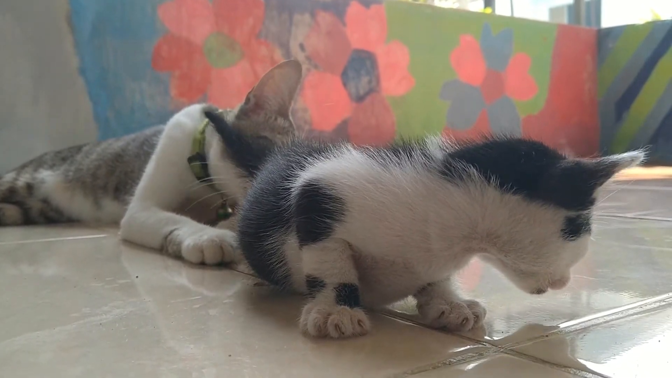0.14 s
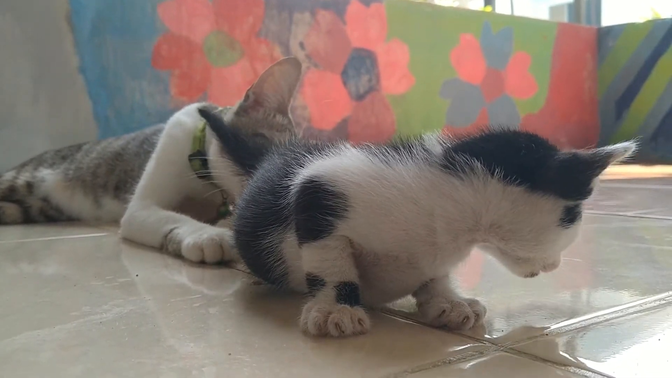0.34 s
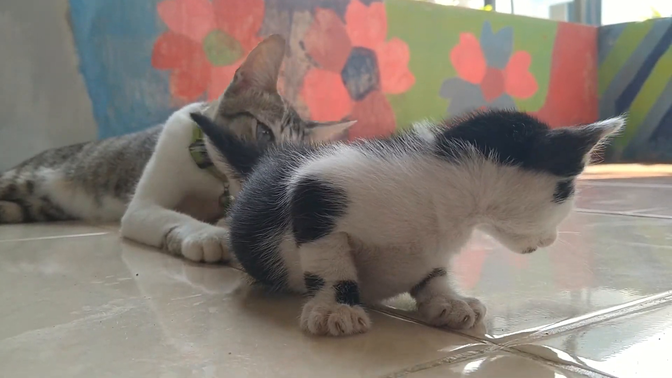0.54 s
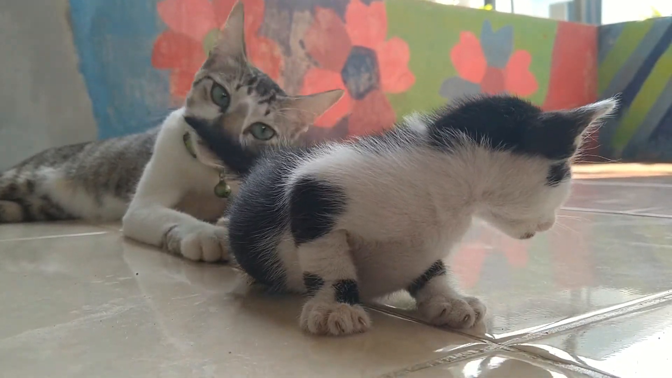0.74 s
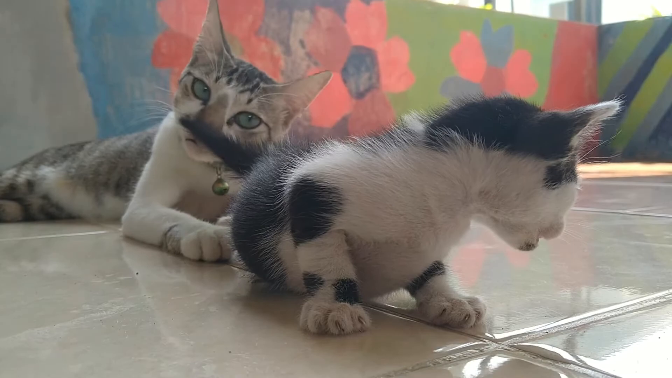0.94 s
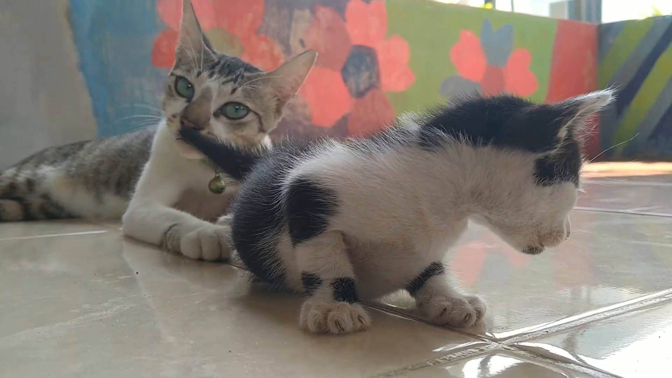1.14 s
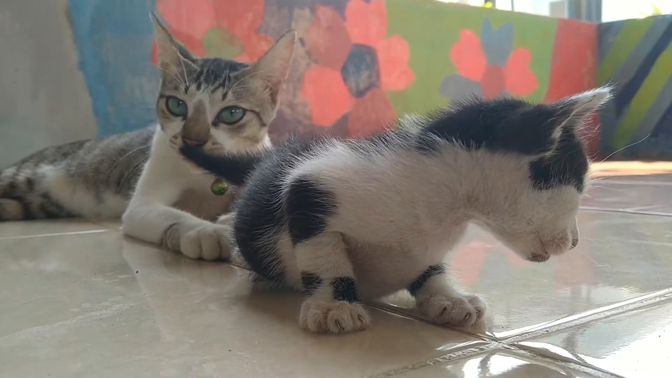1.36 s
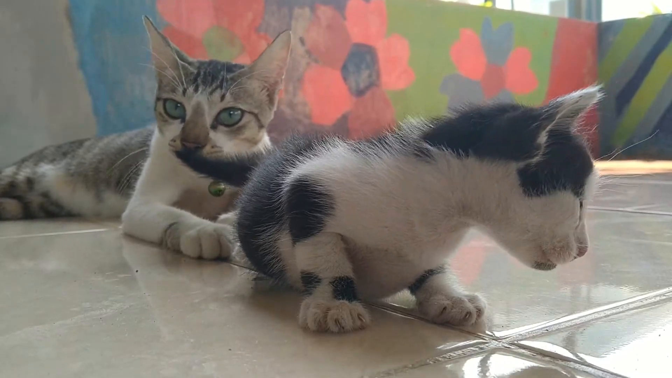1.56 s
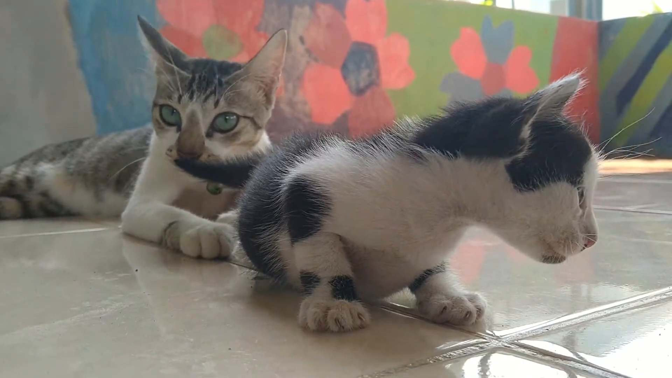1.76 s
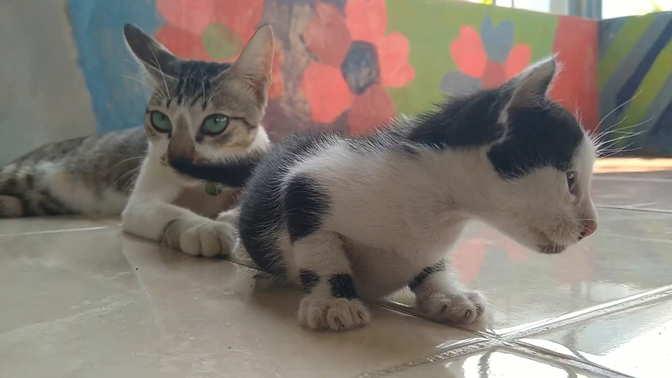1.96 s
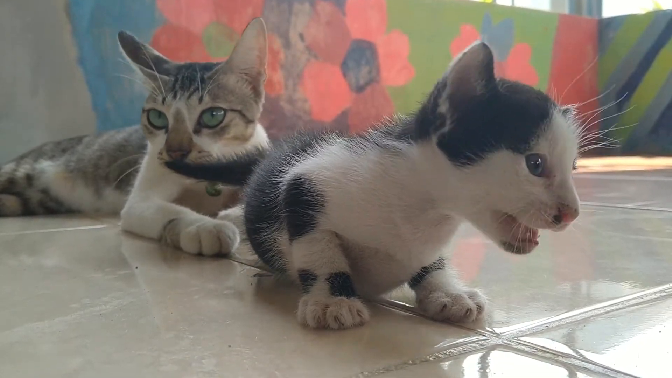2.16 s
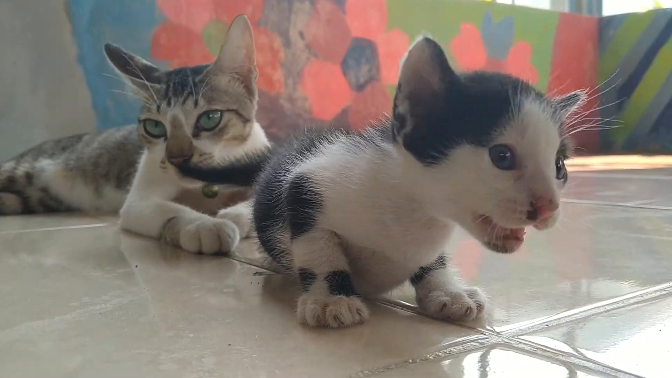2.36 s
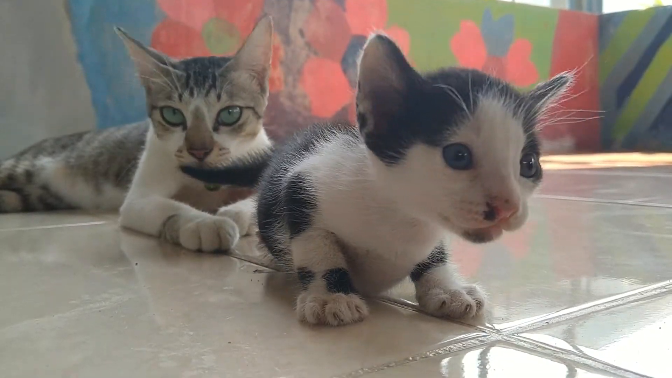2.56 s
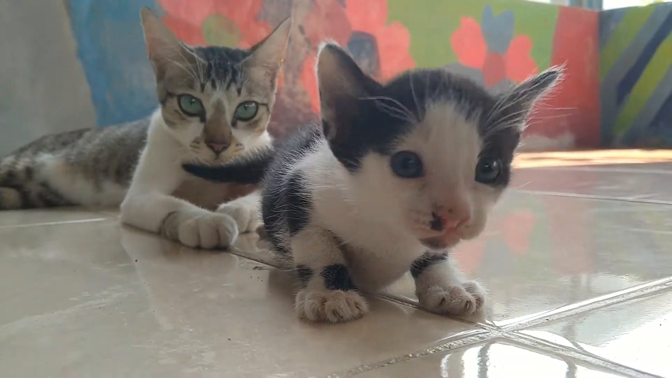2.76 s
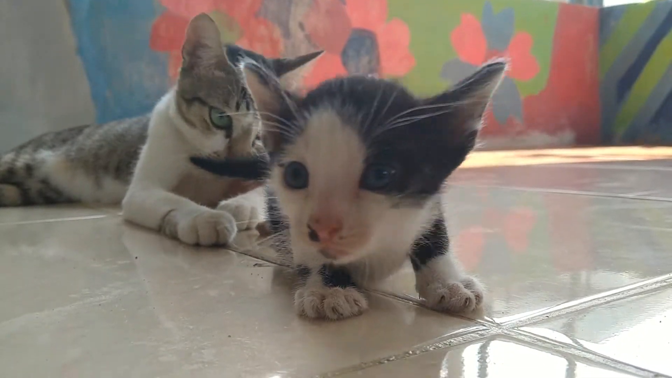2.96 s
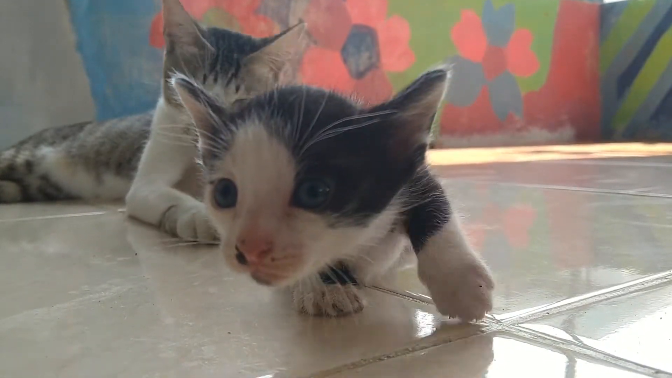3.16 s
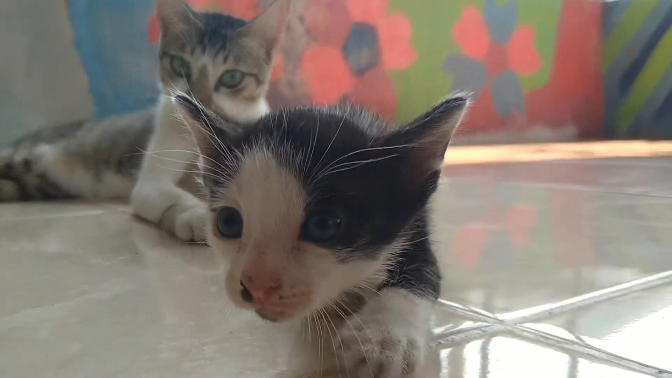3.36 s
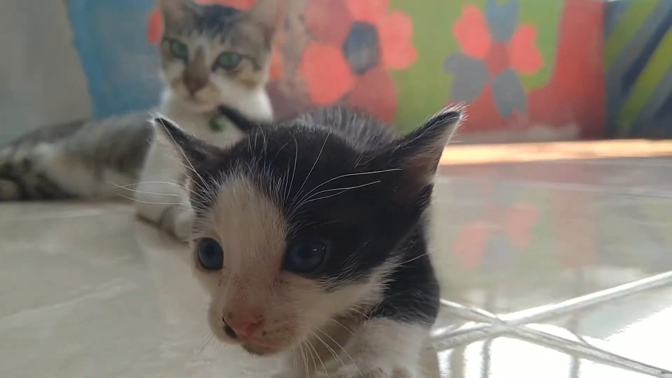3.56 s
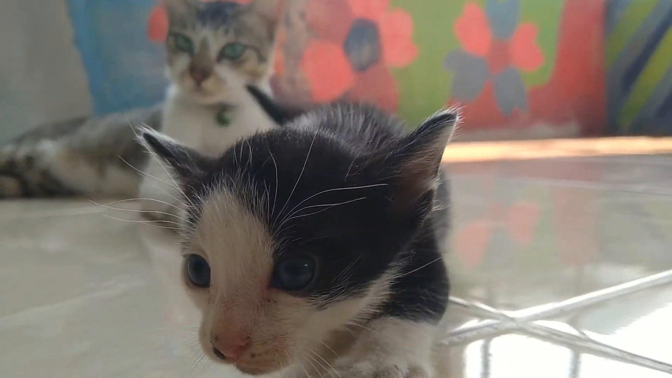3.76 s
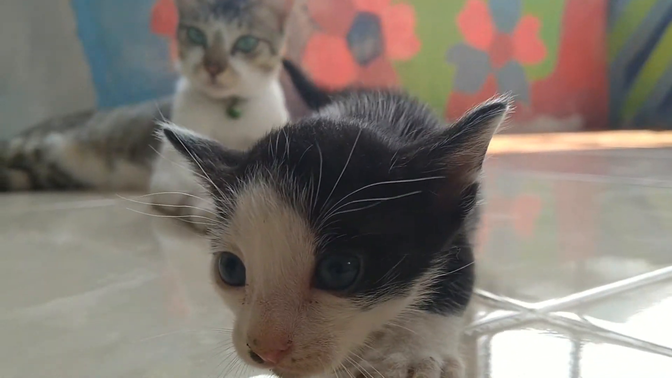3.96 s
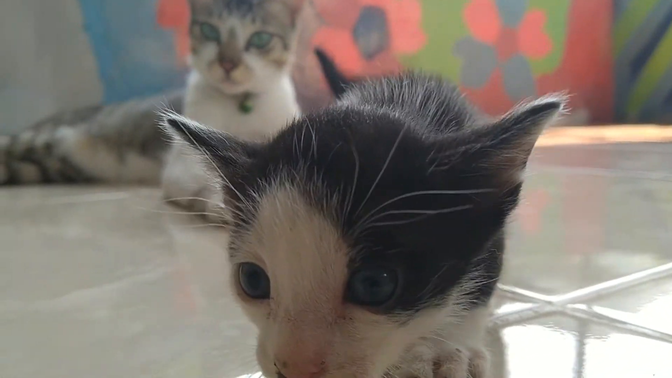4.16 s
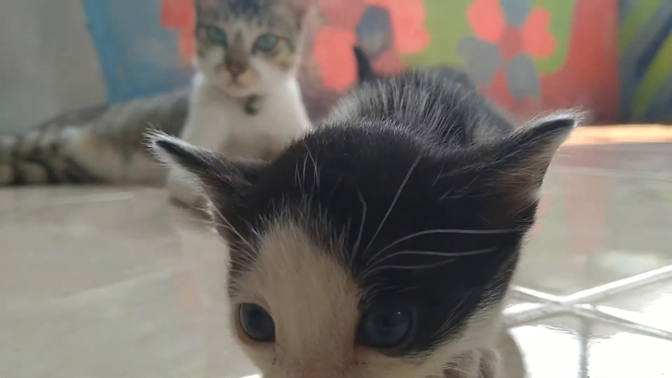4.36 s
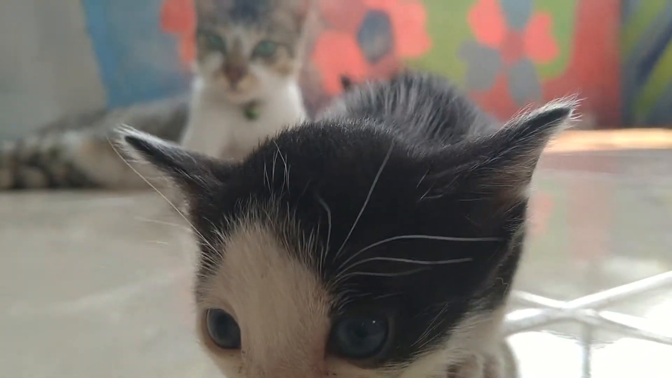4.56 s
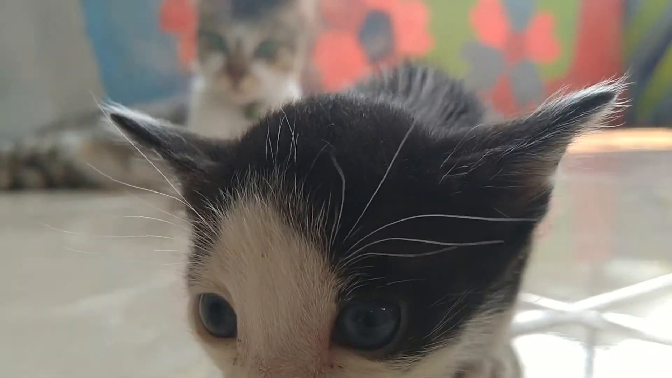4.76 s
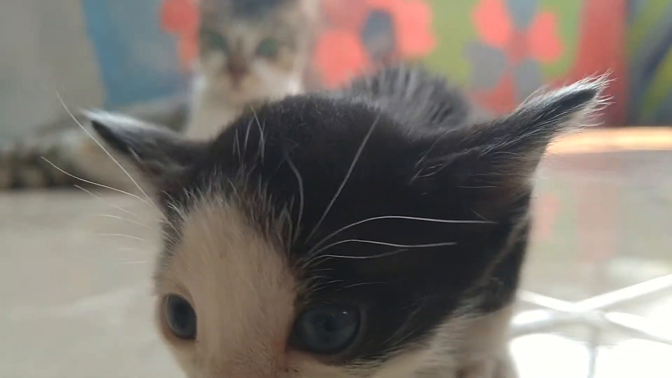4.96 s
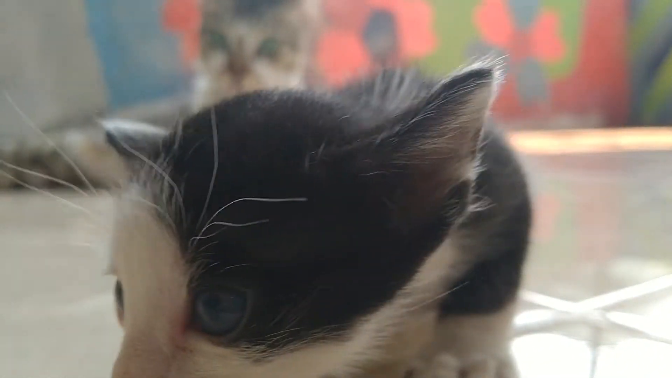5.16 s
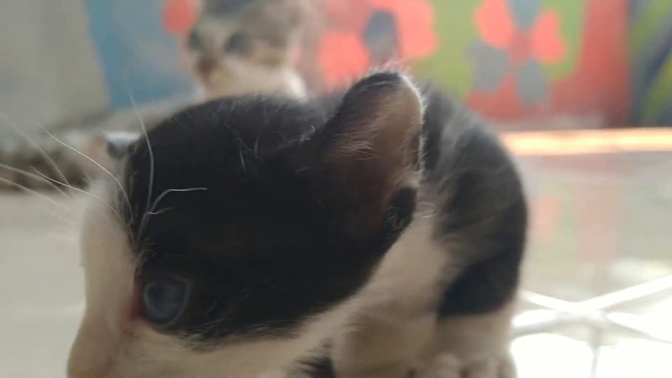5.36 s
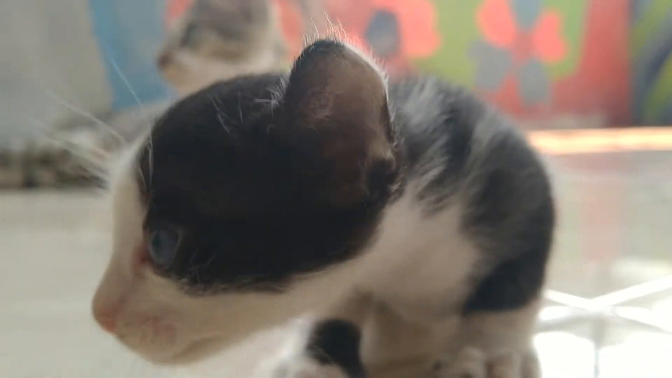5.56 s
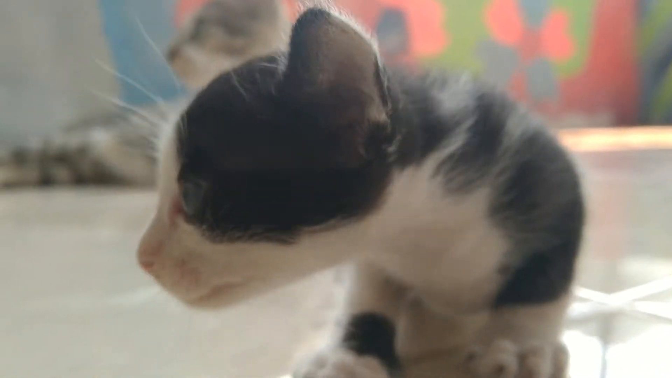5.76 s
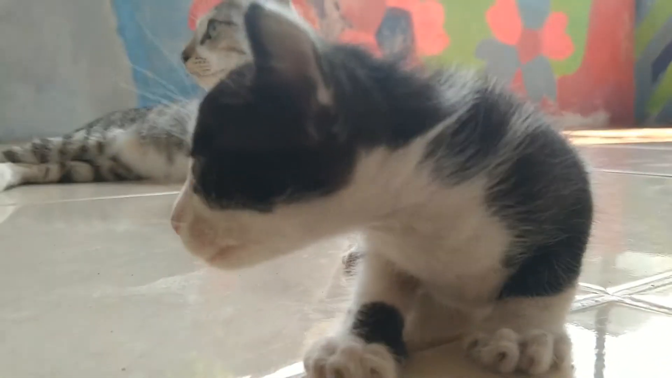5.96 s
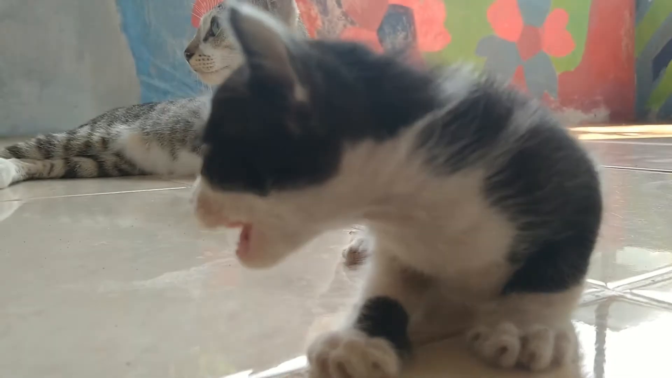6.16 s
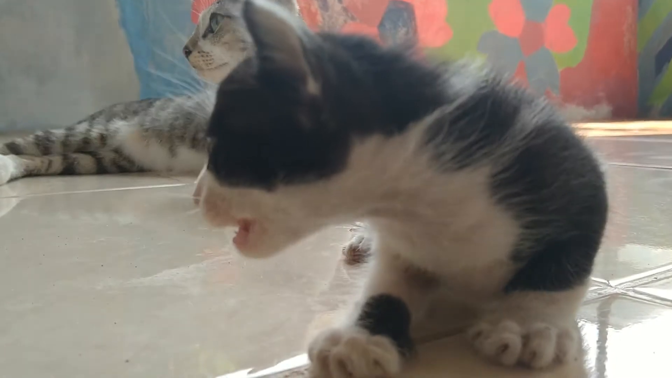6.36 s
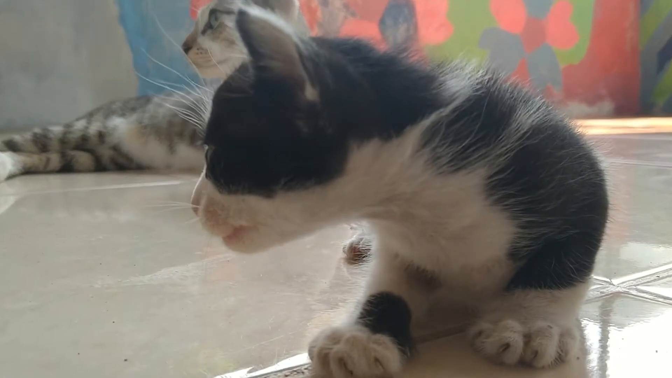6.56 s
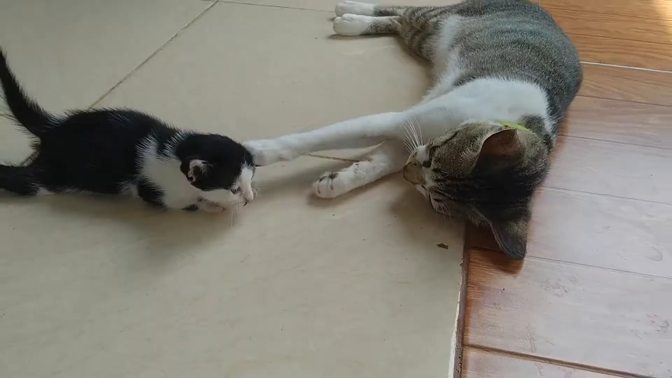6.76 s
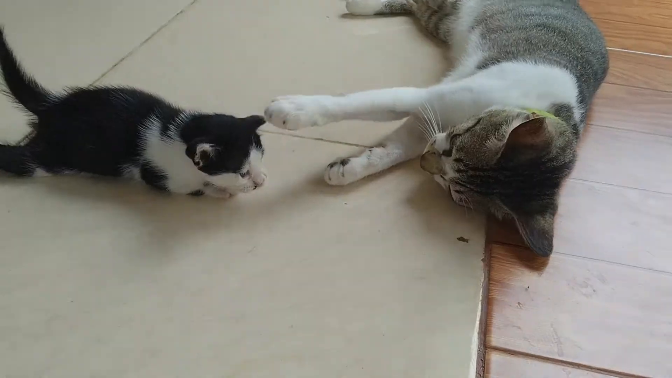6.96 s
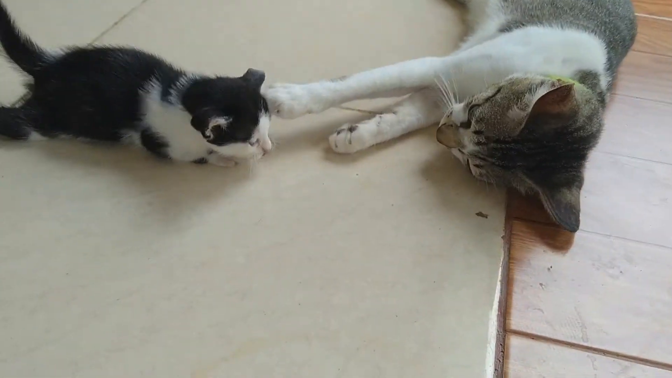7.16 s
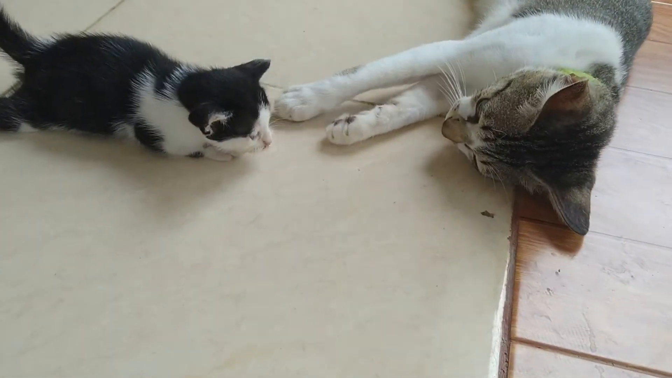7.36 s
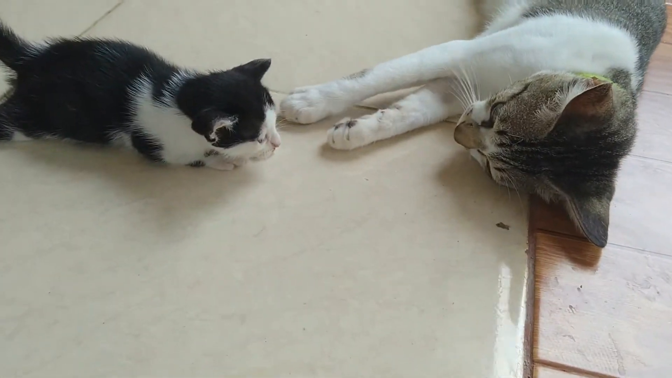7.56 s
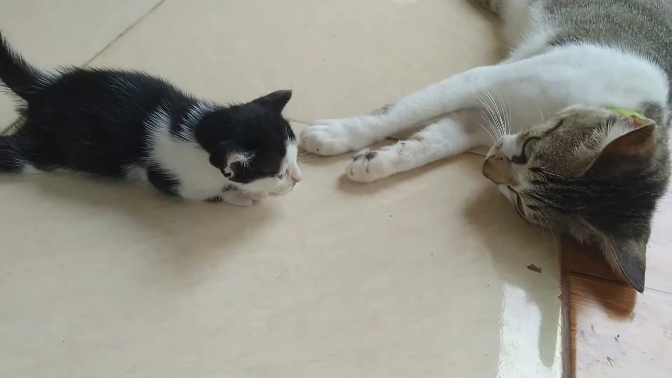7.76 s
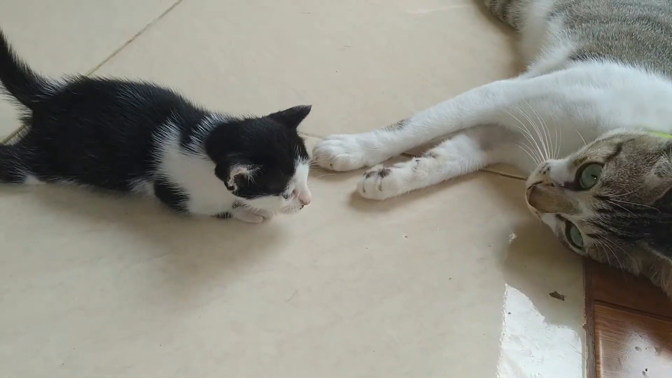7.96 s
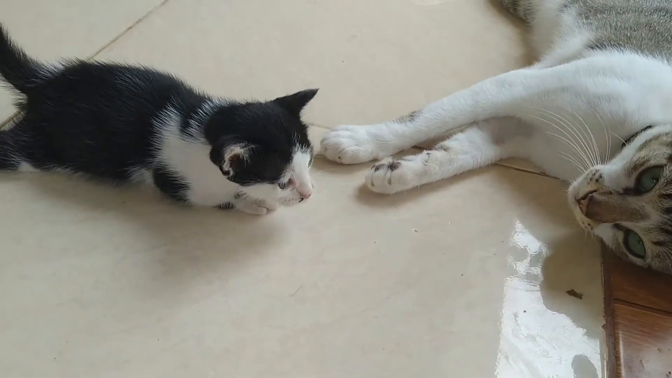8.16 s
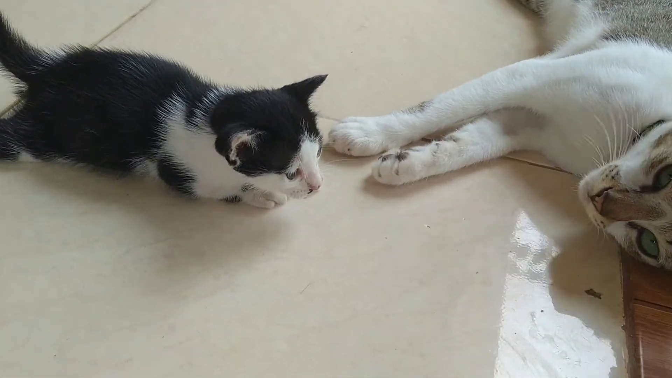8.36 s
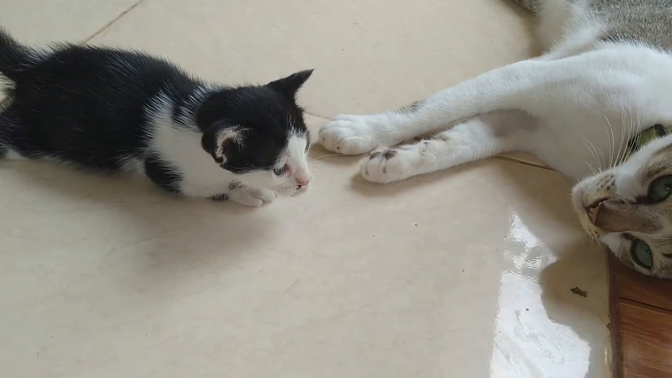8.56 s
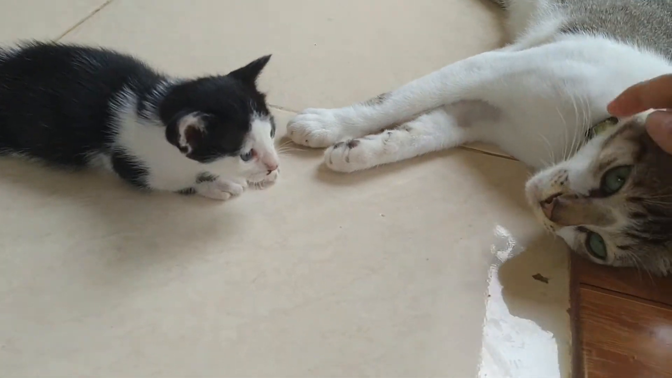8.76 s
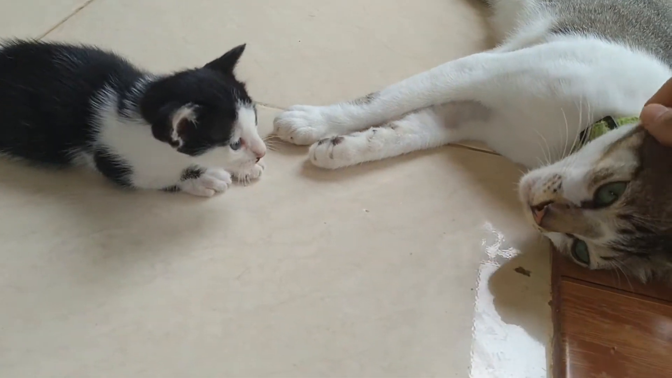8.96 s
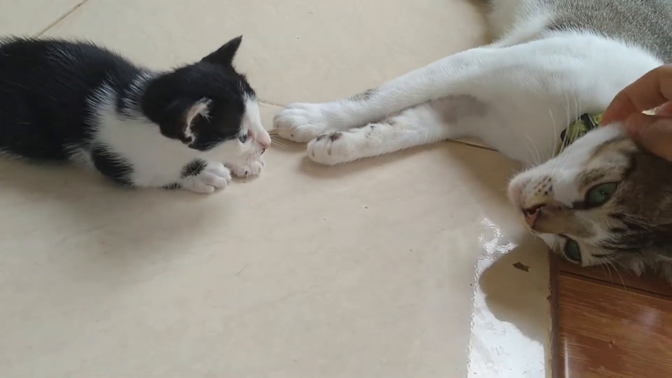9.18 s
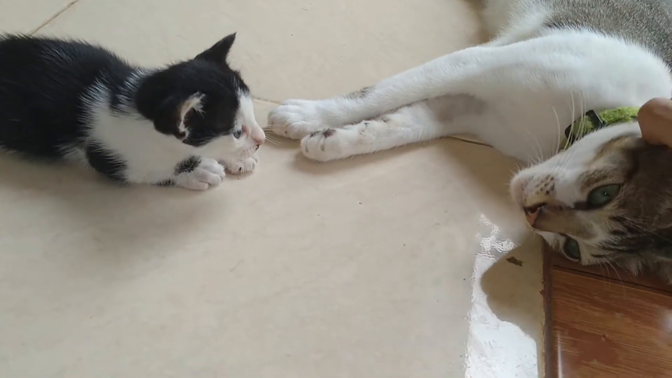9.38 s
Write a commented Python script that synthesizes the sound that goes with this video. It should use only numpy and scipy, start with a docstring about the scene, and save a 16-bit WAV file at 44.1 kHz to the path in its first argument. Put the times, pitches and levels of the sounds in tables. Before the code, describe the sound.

High kitten mews, close and far, ring in a tiled room with one brief scraping thud, before quieter hoots, a chirp and a faint mew.

```python
"""Kittens in a tiled room, then a quiet place

Two kittens mew over a humming fan, one close and dry, one far off in the echo; each cry scoops up,
holds and sags. Something is shoved along the floor, scraping and bumping loudly; paws scuff and tick.
After a short silence comes a quieter place: a thin rising whistle, distant hoots, a bird's chirp,
one faint mew and two clicks. Every voice is a stack of harmonics on a trembling pitch, plus breath."""
import sys
import numpy as np
from scipy import signal
from scipy.fft import rfft, irfft, next_fast_len
from scipy.io import wavfile
from scipy.ndimage import map_coordinates

SR = 44100
rng = np.random.default_rng(int(sys.argv[2]) if len(sys.argv) > 2 else 0)


def dump(signal):
    """Clip the signal to [-1, 1] and save it as 16-bit WAV at the path in sys.argv[1]."""
    limited = np.clip(np.atleast_2d(signal).T, -1, 1)
    pcm = np.round(limited * 32767).astype(np.int16)
    wavfile.write(sys.argv[1], SR, pcm)


N = 415422
TIME = np.arange(N) / SR
ONSET_DB = 17   # hoots and chirps start this far under their peak


def near_kitten():
    """Close, raspy mews with a quavering pitch and only a little room."""
    # start_s, length_s, pitch_hz, scoop_hz, hold_s, sag_hz_per_s, level_db, overtones_db,
    # mouth_widest_s, mouth_wide_s, mouth_db, quaver (share of the pitch)
    mews = [(0.99, 0.2, 1475, 286, 0.08, 2380, -41, -8.5, 0.09, 0.047, -9, 0.015),
            (2.273, 0.26, 1456, 101.6, 0.099, 1053, -31.5, 2, 0.071, 0.036, 9.5, 0.019),
            (6.204, 0.337, 1564, 397, 0.065, 1295, -32.5, 1.5, 0.049, 0.053, 21.5, 0.0094)]
    # swell of each low harmonic: level_db, peak (share of the mew), rise_db_per_s, fall_db_per_s
    harmonics = [(2, 0.79, 55.5, 126), (-4, 0.44, 134, 157), (-30, 0.3, 130, 68), (-16, 0.24, 133, 79)]
    # colour of the harmonics above those: frequency_hz, relative_db
    overtones = [(5500, 5), (7200, -9), (8500, -14), (10000, -21), (11500, -21.5), (13500, -13.5),
                 (15500, -24.5)]
    voice = sum(call(mew_course(mew, harmonics, scoop_s=0.053, attack_s=0.0015),
                     jitter=quaver, jitter_hz=140, shimmer_db=2.2, overtones=overtones,
                     rasp_db=-19.5, breath_db=-7, fade_s=0.003) for *mew, quaver in mews)
    return reverb(voice, wet_db=-12.5)


def far_kitten():
    """Smoother mews, coloured by the mouth's resonance and ringing off the tiles."""
    # start_s, length_s, pitch_hz, scoop_hz, hold_s, sag_hz_per_s, level_db, overtones_db,
    # mouth_widest_s, mouth_wide_s, mouth_db
    mews = [(0.719, 0.34, 1434, 231.7, 0.088, 2255, -44.5, -4.5, 0.15, 0.049, 7),
            (1.525, 0.33, 1491, 266.3, 0.072, 2146, -42, -4, 0.15, 0.058, 10.5),
            (2.625, 0.37, 1479, 264.6, 0.158, 2564, -38.5, 1, 0.19, 0.012, 7.5),
            (3.429, 0.31, 1531, 291.4, 0.094, 2135, -39, -2, 0.12, 0.084, 12),
            (4.357, 0.31, 1550, 243, 0.084, 2370, -36.5, 0, 0.102, 0.013, 9),
            (5.652, 0.32, 1498, 248.3, 0.078, 2200, -38.5, -5, 0.11, 0.067, 11),
            (6.418, 0.3, 1503, 513, 0.12, 1920, -37.5, -1, 0.34, 0.23, 20.5)]
    # swell of each low harmonic: level_db, peak (share of the mew), rise_db_per_s, fall_db_per_s
    harmonics = [(0, 0.2, 220, 42.5), (2.5, 0.35, 132, 137.5), (-1, 0.15, 301.5, 125.5)]
    # colour of the harmonics above those: frequency_hz, relative_db
    overtones = [(4500, -14), (6000, -11), (7500, -18), (9000, -27), (11000, -37), (13800, -26.5),
                 (15500, -36)]
    voice = sum(call(mew_course(mew, harmonics, scoop_s=0.018), jitter=0.006, jitter_hz=110,
                     shimmer_db=2.2, overtones=overtones, rasp_db=-22, breath_db=-12) for mew in mews)
    mouth = butter(voice, 1, [2350, 3100], "band")   # rings near the second harmonic
    return reverb(voice + from_db(-10) * mouth, wet_db=-2)


def faint_kitten():
    """One soft, lower mew with hardly any rasp."""
    # start_s, length_s, pitch_hz, scoop_hz, hold_s, sag_hz_per_s, level_db, overtones_db,
    # mouth_widest_s, mouth_wide_s, mouth_db
    mews = [(8.569, 0.4, 1035, 100.5, 0.19, 800, -50, -2.5, 0.257, 0.041, 15)]
    # swell of each low harmonic: level_db, peak (share of the mew), rise_db_per_s, fall_db_per_s
    harmonics = [(-3.5, 0.33, 53, 20), (-17, 0.5, 30, 55), (4.5, 0.33, 94, 490), (-14, 0.21, 72, 120)]
    # colour of the harmonics above those: frequency_hz, relative_db
    overtones = [(5000, -5), (6200, 3), (7200, -6), (8200, 2), (15000, -18)]
    return sum(call(mew_course(mew, harmonics, scoop_s=0.045), jitter=0.004, jitter_hz=88,
                    shimmer_db=2, overtones=overtones, rasp_db=-35) for mew in mews)


def mew_course(mew, harmonics, scoop_s, attack_s=0.005):
    """The pitch scoops up, holds and sags; the opening mouth shapes the second harmonic."""
    start, length, hz, scoop_hz, hold_s, sag, db, overtones_db, widest_s, wide_s, mouth_db = mew
    bend_s = 0.01573   # rounds the hold off into the sag
    t = steps(length)
    pitch = hz - scoop_hz * np.exp(-t / scoop_s) - sag * bend_s * np.logaddexp(0, (t - hold_s) / bend_s)
    pitch -= 171 * np.exp((t - length) / 0.012)   # a last slip as the voice gives out
    voice_db = db - 7 * np.exp(-t / attack_s)   # comes in soft and catches up
    first, second, *higher = [voice_db + own_db + swell(t, peak * length, rise, fall)
                              for own_db, peak, rise, fall in harmonics]
    second += mouth_db * np.exp(-((t - widest_s) / wide_s) ** 2)
    upper = [level + overtones_db for level in [second, *higher]]
    return np.column_stack([start + t, pitch, first, *upper])


def call(course, jitter, jitter_hz, shimmer_db, overtones=None, rasp_db=-40, breath_db=-60, fade_s=0.012):
    """Trembling, raspy harmonics over breath. Course: time_s, pitch_hz, level_db of each harmonic."""
    start, end = course[0][0], course[-1][0]
    span = (TIME > start - fade_s) & (TIME < end + fade_s)
    t, out, wave = TIME[span], np.zeros(N), 0
    pitch, *levels = in_time(course, t)
    phase = 2 * np.pi * np.cumsum(pitch * (1 + jitter * drift(jitter_hz, len(t)))) / SR
    air = signal.lfilter([0.6], [1, -0.75], rng.standard_normal(len(t)))
    breath = from_db(levels[-1] + breath_db) * air
    if overtones:
        effort_db = 0.5 * np.clip(levels[-1] + 49, -16, 0)   # a soft voice loses its overtones first
        levels += [levels[-1] + effort_db + at_hz(overtones, k * pitch)
                   for k in range(len(levels) + 1, 13)]
    for k, db in enumerate(levels, 1):
        rasp = from_db(rasp_db) * k   # uneven cycles blur the high harmonics most
        blur = 1 + rasp * (drift(550, len(t)) + 1j * drift(550, len(t)))
        wave += from_db(db) * np.imag(blur * np.exp(1j * k * phase)) / np.sqrt(0.5 + rasp ** 2)
    shimmer = from_db(shimmer_db * drift(65.8, len(t)))
    out[span] = (wave + breath) * shimmer * gate(t, start, end, fade_s)
    return out


def shove():
    """Something scrapes over the floor with uneven friction and knocks to a stop."""
    # bumps along the way: time_s, thud_db, crack_db
    knocks = [(4.596, -30.5, -31), (4.63, -22, -47), (4.66, -25.5, -52.5), (4.676, -37, -23),
              (4.752, -43, -29)]
    # colours of the dull friction, the bright friction and the floor's thud: frequency_hz, relative_db
    dull_colour = [(200, -21), (400, -16), (650, -7.5), (1000, -5.5), (1400, -5), (1950, -5), (2500, -14),
                   (3500, -18.5), (4600, -26), (8000, -63.5)]
    bright_colour = [(2000, -18.5), (3000, 1), (5400, -8.5), (7000, -5), (8400, 1.5), (10500, -8.5),
                     (15500, -16)]
    thud_colour = [(25, -32.5), (50, -22), (70, -1.5), (120, -2.5), (170, 3), (230, 1.5), (300, 0.5),
                   (420, -39)]
    start_s, full_force_s = 4.58, 0.11
    knock_attack_s, knock_decay_s = 0.003, 0.013
    t = TIME - start_s
    slowing = np.maximum(t - full_force_s, 0)
    push = np.clip(t / 0.014, 0, 1) * from_db(-92 * slowing)
    dull = from_db(-21) * push
    thud = from_db(-36) * push   # the floor shakes as long as the thing slides
    bright = from_db(-32 - 102.5 * slowing) * np.clip(t / 0.03, 0, 1) ** 2
    for at, thud_db, crack_db in knocks:
        blow = np.clip((TIME - at) / knock_attack_s, 0, 1) * strike(at, knock_decay_s)
        thud = np.hypot(thud, from_db(thud_db) * blow)
        bright = np.hypot(bright, from_db(crack_db) * blow)
    scrape = dull * noise(dull_colour) + bright * noise(bright_colour)
    friction = from_db(1.1 * drift(250, N))
    return reverb(scrape * friction + thud * noise(thud_colour), wet_db=-14)


def hoots():
    """In each hoot two voices start together: one holds its pitch, the other falls away under it."""
    # start_s, length_s, pitch_hz, held_db, falling_db
    notes = [(7.642, 0.085, 1044, -34.5, -38), (8.105, 0.085, 1085, -35, -39),
             (8.224, 0.102, 1065, -47, -54)]
    attack_s, fall_s, from_hz, to_hz = 0.016, 0.0313, 975, 729
    out = np.zeros(N)
    for start, length, hz, db, falling_db in notes:
        t = steps(length)
        level = db + swell(t, attack_s, ONSET_DB / attack_s, fall_db_per_s=115)
        held = np.column_stack([start + t, np.full_like(t, hz), level, level - 30])
        glide = to_hz + (from_hz - to_hz) * np.exp(-(t / fall_s) ** 2)
        falling = np.column_stack([start + t, glide, falling_db - 92 * t])
        out += call(held, jitter=0.022, jitter_hz=131, shimmer_db=1.5, breath_db=6, fade_s=0.0066)
        out += call(falling, jitter=0.016, jitter_hz=128, shimmer_db=1.5, fade_s=0.00476)
    return out


def bird():
    """A chirp starts hoarse and leaves a purer, lingering note."""
    # start_s, length_s, pitch_hz, level_db
    chirps = [(7.916, 0.208, 3654, -40)]
    # harmonics 2 to 4 of the opening burst: relative_db
    overtones_db = [-19, -29, -31]
    scoop_hz, attack_s, hoarse_s = 192, 0.025, 0.079
    out = np.zeros(N)
    for start, length, hz, db in chirps:
        t = steps(length)
        pitch = hz - scoop_hz * np.maximum(1 - t / attack_s, 0)
        burst = db + swell(t, attack_s, ONSET_DB / attack_s, fall_db_per_s=335)
        ring = db - 14 + swell(t, attack_s, ONSET_DB / attack_s, fall_db_per_s=34)
        upper = [burst + own_db for own_db in overtones_db]
        course = np.column_stack([start + t, pitch, np.maximum(burst, ring), *upper])
        note = call(course, jitter=0.012, jitter_hz=700, shimmer_db=3.2,
                    rasp_db=-15, breath_db=9, fade_s=0.005)
        squeak = call(course[t < hoarse_s, :4], jitter=0.1, jitter_hz=1500, shimmer_db=2.2)
        out += note + from_db(-2) * squeak
    return out


def paws():
    """Paws and fur brush the floor in grainy strokes; claw ticks die within milliseconds."""
    # start_s, length_s, level_db, centre_hz, width_octaves
    scuffs = [(0.277, 0.22, -65, 1600, 1.8), (1.247, 0.17, -63.5, 3740, 0.17),
              (3.2, 0.82, -71, 13700, 0.17), (3.417, 0.31, -62, 8000, .2), (3.787, 0.61, -55, 2630, 0.51),
              (3.797, 0.065, -43.5, 1040, 0.89), (5.433, 0.074, -47.5, 2490, 0.46),
              (5.551, 0.41, -58.5, 7860, 0.47), (8.499, 0.13, -53.5, 2350, 0.56),
              (8.5, 0.11, -59, 7740, 0.36)]
    # start_s, level_db
    ticks = [(2.523, -52), (2.578, -55), (4.02, -49), (4.342, -48), (5.575, -56), (5.632, -55),
             (5.848, -49), (7.457, -55), (8.752, -53)]
    out = np.zeros(N)
    for start, length, db, centre_hz, octaves in scuffs:
        size, at = int(length * SR), int(start * SR)
        hz = np.fft.rfftfreq(size, 1 / SR) + 1
        band = np.exp(-0.5 * (np.log2(hz / centre_hz) / octaves) ** 2)
        rub = irfft(rfft(rng.standard_normal(size)) * band, size)
        grain = from_db(1.5 * drift(160, size))
        stroke = np.sin(np.pi * np.linspace(0, 1, size) ** 0.58)
        out[at:at + size] += from_db(db) * rms_one(rub) * stroke * grain
    taps = sum(from_db(db) * strike(start, decay_s=0.003) for start, db in ticks)
    return out + taps * noise([(800, -12), (3500, 12), (8500, -1), (15000, -6)])


def clicks():
    """Two sharp bursts of noise with a ring near 4 kHz."""
    # start_s, level_db
    hits = [(9.098, -50), (9.187, -53.5)]
    # frequency_hz, relative_db
    colour = [(1500, -28), (3700, -17), (4150, 11), (4600, 1), (5400, 1), (6200, -28), (12000, -28)]
    return noise(colour) * sum(from_db(db) * strike(start, decay_s=0.0095) for start, db in hits)


def rising_whistle():
    """A breathy whistle climbs ever more slowly while its second harmonic fades."""
    # start_s, length_s, pitch_hz, rise_hz_per_s, level_db, second_harmonic_db
    whistles = [(6.94, 0.48, 1510, 2650, -68, -66)]
    slowing_hz_per_s2 = 2600
    out = np.zeros(N)
    for start, length, hz, rise, db, second_db in whistles:
        t = steps(length)
        pitch = hz + rise * t - slowing_hz_per_s2 * t ** 2 / 2
        course = np.column_stack([start + t, pitch, db + 2 * t, second_db - 29 * t])
        out += call(course, jitter=0.02, jitter_hz=392, shimmer_db=2.5, rasp_db=-12)
    return out


def high_whistles():
    """Very thin whistles, each rising and falling in one arch."""
    # start_s, length_s, top_hz, depth_hz, level_db
    arches = [(1.93, 0.33, 13900, 1300, -82), (4.89, 0.27, 15200, 1200, -77), (5.15, 0.11, 14250, 400, -79),
              (7.8, 0.3, 8650, 600, -82)]
    out = np.zeros(N)
    for start, length, top_hz, depth_hz, db in arches:
        t = steps(length)
        pitch = top_hz - depth_hz * (2 * t / length - 1) ** 2
        course = np.column_stack([start + t, pitch, np.full_like(t, db)])
        out += call(course, jitter=0.004, jitter_hz=200, shimmer_db=4.5)
    return out


def fan():
    """The tiled room's bed: a soft rush of air and a hum that slowly grows."""
    # frequency_hz, relative_db
    air_colour = [(18, -65), (30, -39.5), (130, -2), (160, -7), (193, -3), (244, -7.5), (278, -8),
                  (334, -11), (361, -14.5), (457, -16), (594, -7.5), (752, -11), (1740, -8.5),
                  (2710, -23.5), (3810, -27.5), (4830, -39.5), (6780, -40.5), (8360, -30), (9530, -41),
                  (14100, -49), (15700, -59.5)]
    # pitch_hz, level_db
    tones = [(142, -56.5), (188, -56.5), (281.5, -54.5), (328, -57), (1767, -60.5)]
    # level rides of the air and the hum: time_s, gain_db
    air_swell = [(0, -4), (.6, -7), (1.4, -6.5), (3, -6), (4.2, -4), (5.3, -4.5), (6.7, -5.5)]
    hum_swell = [(0, -5.5), (1, -2.5), (2.2, -0.5), (4.2, 0.5), (6.7, 2)]
    air = from_db(-41.5 + in_time(air_swell)[0]) * noise(air_colour)
    return air + from_db(in_time(hum_swell)[0]) * hum(tones, waver_db=0.5)


def quiet_air():
    """The quiet place's bed: gently heaving air and a faint hum."""
    # frequency_hz, relative_db
    colour = [(18, -80), (30, -40), (65, -16.5), (111, -13), (144, 2.5), (208, -14), (237, -7), (352, -15),
              (677, -10), (1080, -15.5), (1880, -17.5), (4020, -31.5), (5650, -42), (8590, -34.5),
              (10600, -44), (15700, -53)]
    # time_s, level_db
    ride = [(6.93, -56), (7.2, -53), (7.55, -57.5), (8.15, -51.5), (8.6, -55), (9.0, -56), (9.42, -57)]
    # pitch_hz, level_db
    tones = [(144, -60.5), (189, -64.5), (231, -68.5), (1412, -70.5)]
    return from_db(in_time(ride)[0]) * noise(colour) + hum(tones, waver_db=2)


def hum(tones, waver_db):
    """Steady pitches, each wavering in strength on its own."""
    return sum(np.sqrt(2) * from_db(db + waver_db * drift(9, N))
               * np.sin(2 * np.pi * (hz * TIME + rng.random())) for hz, db in tones)


def reverb(x, wet_db):
    """Direct sound plus a diffuse tail whose treble dies first; the total power is kept."""
    # time to die away by 60 dB: frequency_hz, decay_s
    t60 = [(100, 1), (600, 0.75), (1500, 0.4), (3000, 0.27), (6000, 0.45), (14000, 0.24)]
    t, edges_hz, tail = TIME[:SR], 40 * 2 ** np.arange(10), 0
    for low, high in zip(edges_hz, edges_hz[1:]):
        band = butter(rng.standard_normal(SR), 2, [low, high], "band")
        tail += band * from_db(-60 * t / at_hz(t60, np.sqrt(low * high)))
    tail *= np.clip(t / 0.003, 0, 1)
    echo = signal.fftconvolve(x, tail / np.linalg.norm(tail))[:N]
    wet = from_db(wet_db)
    return (x + wet * echo) / np.hypot(1, wet)


def noise(colour):
    """Noise at rms 1 whose spectral density follows the colour."""
    size = next_fast_len(N)
    gain = from_db(at_hz(colour, np.fft.rfftfreq(size, 1 / SR)))
    return rms_one(irfft(rfft(rng.standard_normal(size)) * gain, size)[:N])


def drift(rate_hz, size):
    """A smooth random wobble with a spread of about 1."""
    place = np.arange(size) / SR * rate_hz
    return map_coordinates(rng.standard_normal(4096), [place], order=2, mode="wrap")


def swell(t, peak_s, rise_db_per_s, fall_db_per_s):
    """Level in dB that climbs to 0 at peak_s and then falls."""
    return -rise_db_per_s * np.maximum(peak_s - t, 0) - fall_db_per_s * np.maximum(t - peak_s, 0)


def strike(start_s, decay_s):
    """Envelope with an instant attack and an exponential decay."""
    return (TIME >= start_s) * np.exp(-np.abs(TIME - start_s) / decay_s)


def gate(t, start, end, fade_s):
    """1 between start and end, with sloping edges."""
    return np.clip((t - start) / fade_s + 0.5, 0, 1) * np.clip((end - t) / fade_s + 0.5, 0, 1)


def steps(length_s):
    """Moments within a call, counted from its start."""
    return np.linspace(0, length_s, 120)


def in_time(rows, t=TIME):
    """The columns of a curve at times t."""
    times, *columns = np.transpose(rows)
    return [np.interp(t, times, column) for column in columns]


def at_hz(points, hz):
    """Read a curve on a log-frequency axis."""
    frequencies, values = np.transpose(points)
    return np.interp(np.log(np.maximum(hz, 1)), np.log(frequencies), values)


def butter(x, order, hz, kind):
    """A filter with a flat passband."""
    return signal.sosfilt(signal.butter(order, hz, kind, fs=SR, output="sos"), x)


def from_db(db):
    """Decibels to gain."""
    return 10 ** (np.asarray(db) / 20)


def rms_one(x):
    """Scale to rms 1."""
    return x / np.sqrt(np.mean(x ** 2) + 1e-20)


def scene():
    """The tiled room, a moment of silence, then the quiet place; paws are heard in both."""
    silence_from_s, silence_to_s = 6.743, 6.93
    tiled_room = fan() + near_kitten() + far_kitten() + shove() + high_whistles()
    nearby = reverb(faint_kitten() + clicks(), wet_db=-8)
    distant = reverb(hoots() + bird() + rising_whistle(), wet_db=1)
    quiet_place = nearby + distant + quiet_air()
    before = gate(TIME, -1, silence_from_s, fade_s=0.005)
    after = gate(TIME, silence_to_s, TIME[-1] + 1, fade_s=0.005)
    return (before * tiled_room + after * quiet_place + paws())[None]


def record(dry):
    """The deepest bass is rolled off and the very top is cut steeply."""
    thin = butter(dry, 2, 45, "high")
    return signal.sosfilt(signal.ellip(12, 0.1, 80, 15800, fs=SR, output="sos"), thin)


dry = scene()
out = record(dry)
dump(out)
```